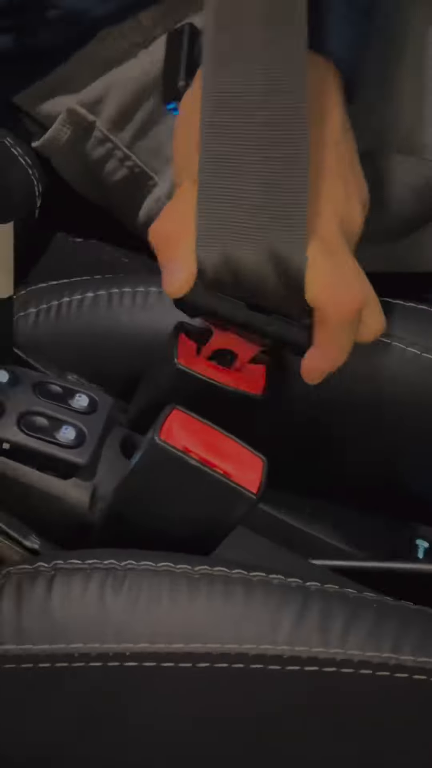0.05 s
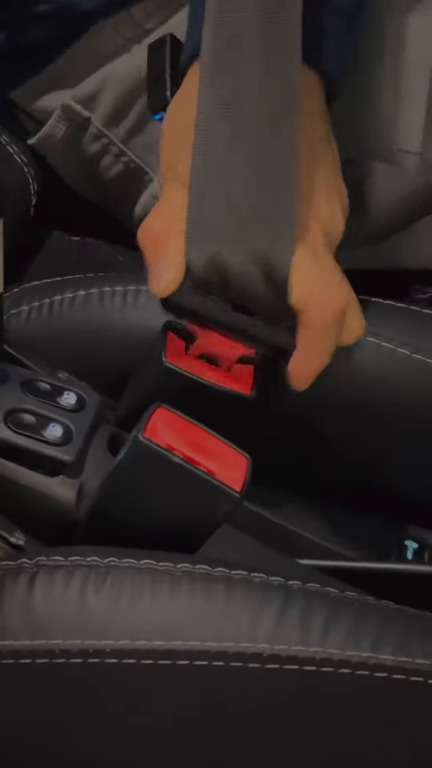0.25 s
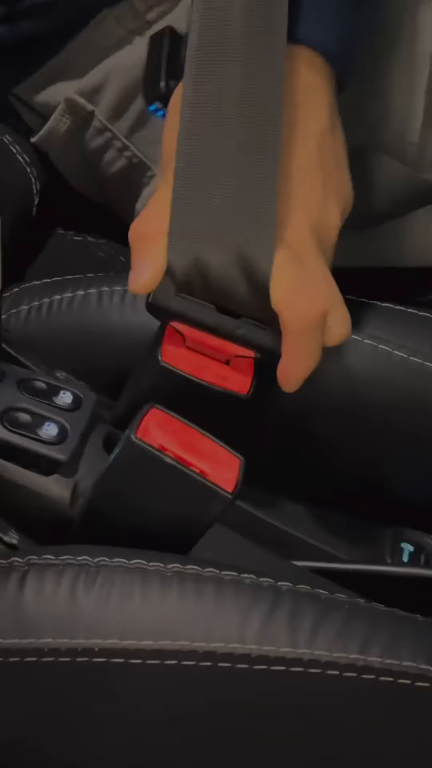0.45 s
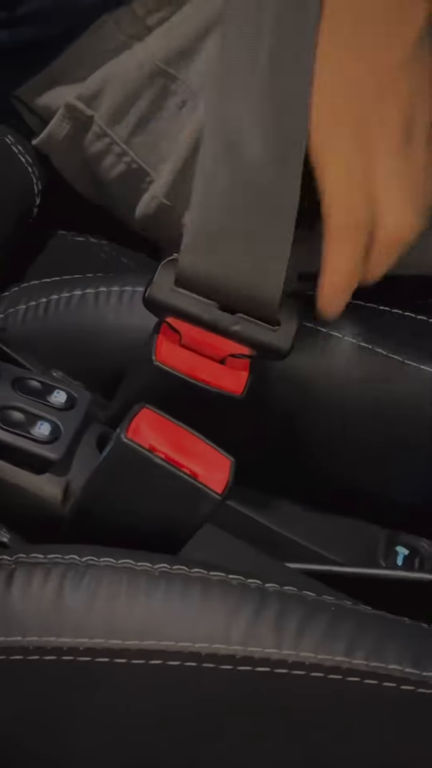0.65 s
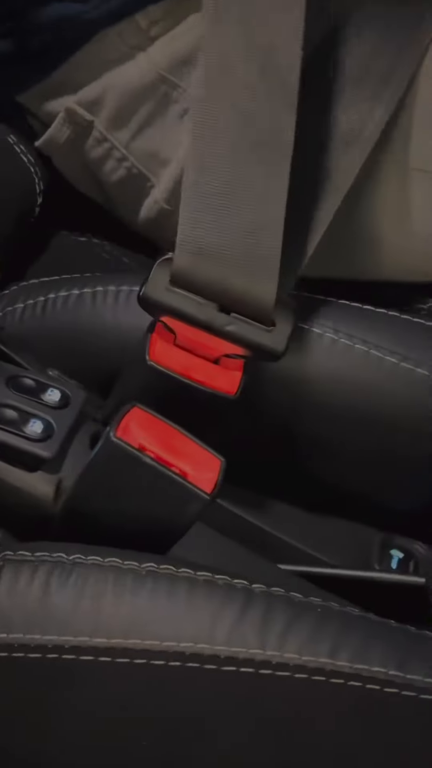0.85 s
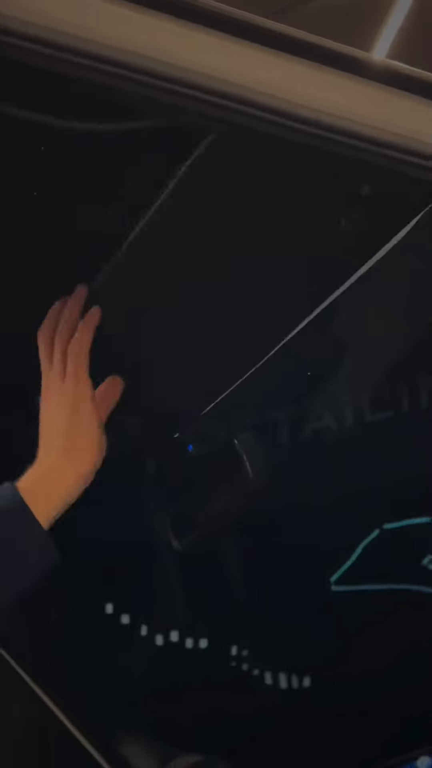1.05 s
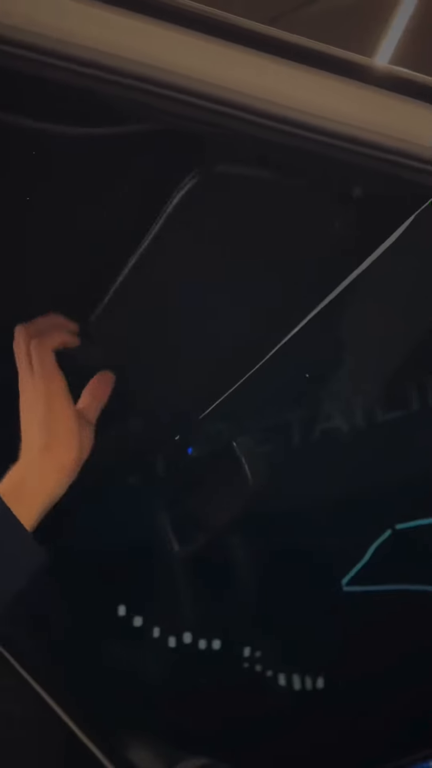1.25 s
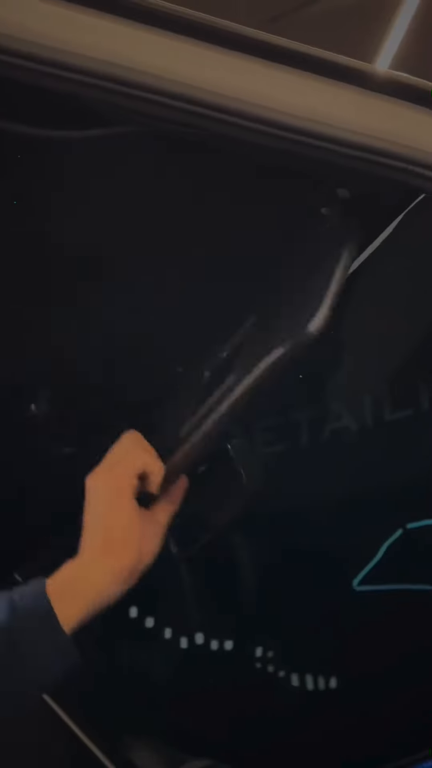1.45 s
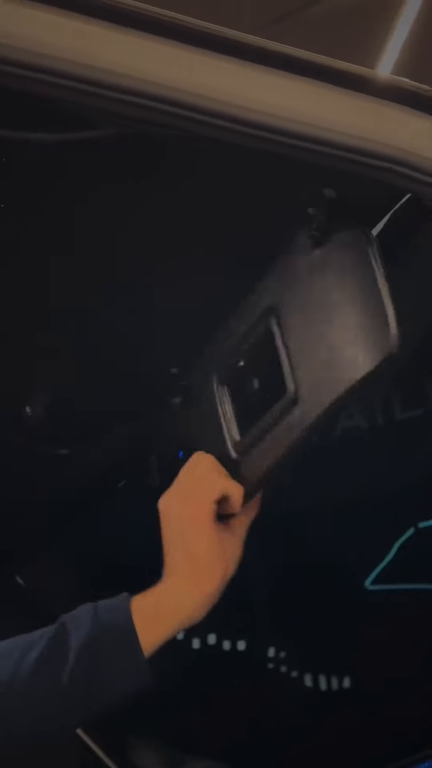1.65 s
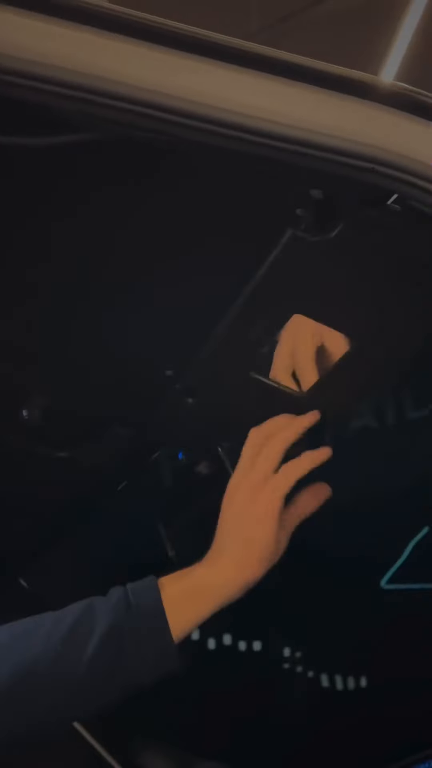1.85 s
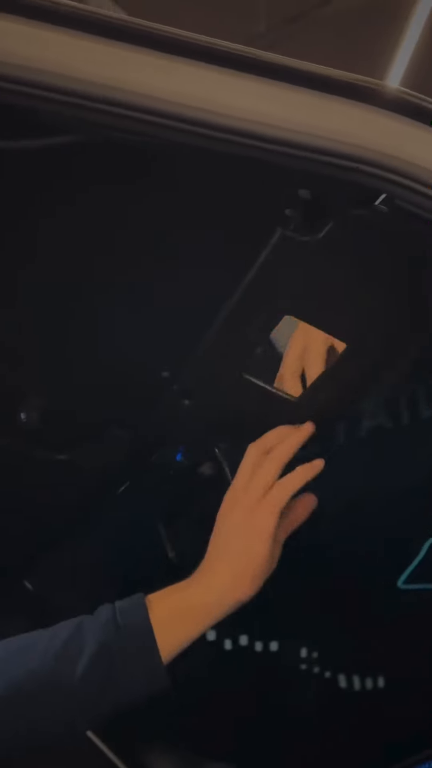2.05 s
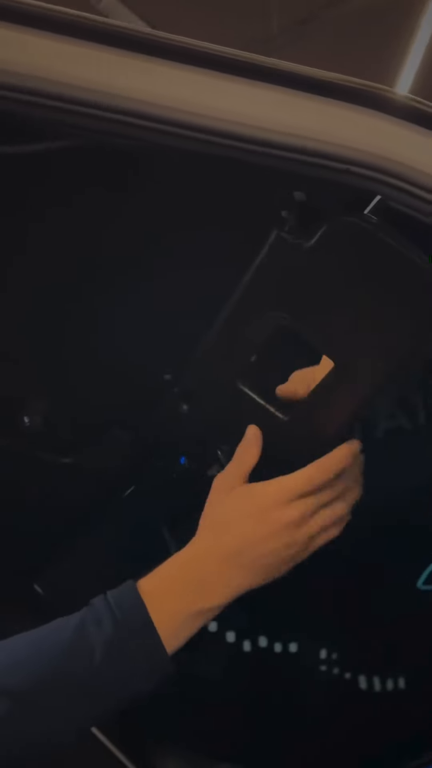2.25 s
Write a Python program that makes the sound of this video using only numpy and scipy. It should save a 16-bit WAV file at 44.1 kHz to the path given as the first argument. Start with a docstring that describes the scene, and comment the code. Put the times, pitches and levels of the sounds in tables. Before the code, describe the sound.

A seat belt clicks loudly into its buckle at about 0.2 seconds, close by inside a parked car. It rattles briefly at 0.4 seconds and the strap slides softly until 1 second, when the steady background hiss turns quieter and slightly hollow. From 1.1 to 1.8 seconds a sun visor folds down, its hinge creaking, then squeaking, ending in soft knocks. One last short creak comes near 2.1 seconds.

```python
"""Seat belt and sun visor in a parked car

Two shots inside the cabin, belt then visor. The belt's steel tongue snaps into its buckle, then
rattles as the hand lets go and the webbing slides. A sun visor is folded down: its hinge sticks and
slips, from a slow creak to a squeak, and the panel knocks softly. A last short creak follows.
A hiss lies under it all; at the cut it turns quieter and slightly hollow."""
import sys
import numpy as np
from scipy import signal
from scipy.fft import rfft, irfft, next_fast_len
from scipy.io import wavfile

SR = 44100
rng = np.random.default_rng(int(sys.argv[2]) if len(sys.argv) > 2 else 0)


def transcribe(u):
    """Save the signal u as a 16-bit wav file named by the first command-line argument.

    u: samples, shape (n,) or (channels, n), limited to [-1, 1]; the rate is SR.
    q: integer samples, one column per channel.
    """
    v = np.clip(np.atleast_2d(u).T, -1, 1)
    q = np.round(v * 32767).astype(np.int16)
    wavfile.write(sys.argv[1], SR, q)


N = 101429
T = np.arange(N) / SR
RING_T = np.arange(SR // 5) / SR  # time axis of one impact


# Modes of the housing and steel parts. Each row: pitch in Hz, level in dB, t60 in seconds.
STEEL_MODES = [(900, -10, .018), (1330, -8, .022), (1715, -4, .03), (2420, -7, .026), (3380, -5, .045),
               (3780, -2, .038), (5300, -5, .025), (5560, -6, .032), (6980, -3, .026), (7380, -6, .028),
               (7810, -2, .026), (8470, -3, .022), (8880, -3, .024), (9350, -1, .022)]
def strikes(contacts, colour, t60, ring_db, crack_db=-4):
    """Each contact of the tongue cracks in the plastic housing and rings the steel parts."""
    out = np.zeros(N)
    for start, db in contacts:
        ring = 0
        for hz, mode_db, mode_t60 in STEEL_MODES:
            envelope = amp(mode_db + rng.normal(0, 0.65)) * decay(mode_t60)
            ring += envelope * np.sin(2 * np.pi * (hz * RING_T + rng.random()))
        crack = noise(colour, len(RING_T)) * decay(t60)
        add(out, start, amp(db) * (amp(crack_db) * crack + amp(ring_db) * ring))
    return out


# The tongue's plastic cover on the buckle. Each row: start in seconds, level in dB, pitch in Hz.
COVER_TAPS = [(.3872, -28.5, 3800), (0.424, -37.5, 1370), (0.432, -34, 1280), (0.4381, -31, 1300),
              (0.449, -35, 1310)]
def cover_taps():
    """The cover touches the buckle: short hollow ticks."""
    out = np.zeros(N)
    for start, db, hz in COVER_TAPS:
        ring = shaped_noise(lambda f: resonances([(hz, 0.2 * hz, 0)], f), len(RING_T))
        add(out, start, amp(db) * ring * decay(0.022))
    return out


# The tongue's contacts, going in and once latched. Each row: start in seconds, level in dB.
LATCH_HITS = [(.2055, -14), (.2105, -4.5), (.2149, 0.5), (.2188, -4), (.2235, -22), (.228, -22)]
RATTLE_HITS = [(.4003, -18.5), (.4024, -14), (.406, -16), (.409, -19), (.4113, -34), (.416, -25.5),
               (.4372, -30)]
# Steel sliding in the slot. Each row: time in seconds, level in dB.
SCRAPE_LEVEL = [(.188, -93), (.192, -34), (.204, -41.5), (.212, -33), (.231, -27), (.235, -104)]
# Their spectra at the microphone. Each row: frequency in Hz, level in dB.
LATCH_COLOUR = [(100, -28), (300, -5.5), (550, -9), (900, 0), (1600, 3), (2300, -4.5), (3500, 2.5),
                (4700, -4), (6500, -2.5), (9000, 1.5), (10500, -9.5)]
RATTLE_COLOUR = [(100, -1), (750, -33), (1200, 4.5), (1700, -7), (2400, 1.5), (3000, -7.5), (3900, -2),
                 (5300, 0), (6400, -11), (7200, 13), (8300, -15), (10500, -14)]
SCRAPE_COLOUR = [(500, -24), (1500, -4), (6500, -15.5), (8600, 4.5), (9600, -18), (10500, -12.5)]
def buckle():
    """Down by the seat the tongue scrapes into the slot, latches, then shifts in the closed buckle."""
    latch = strikes(LATCH_HITS, LATCH_COLOUR, t60=0.024, ring_db=-10.5)
    scrape = rubbing(SCRAPE_LEVEL, SCRAPE_COLOUR)
    rattle = strikes(RATTLE_HITS, RATTLE_COLOUR, t60=0.023, ring_db=-18.5)
    return latch + scrape + rattle + cover_taps()


# Resonances of the visor panel. Each row: centre in Hz, width in Hz, level in dB.
PANEL_MODES = [(496, 97, -8), (1257, 20, 1), (1656, 17, 3.5), (2664, 55, 2.5), (3223, 26, 13)]
def panel(f, delay_s=0.0012, at_hz=1000):
    """The panel's response: it rings, and low bending waves cross later, so a slip becomes a chirp."""
    bending = np.exp(-4j * np.pi * delay_s * np.sqrt(at_hz * f))
    return bending * (1 + resonances(PANEL_MODES, f))


# The bright part of the hinge's rubbing. Each row: frequency in Hz, level in dB.
RASP_COLOUR = [(500, -11.5), (3000, -3.5), (7500, 1), (10000, -11.5)]
def stick_slip(stroke, colour, rub_swing=0.23, rasp_db=-1):
    """One pulse per slip of the hinge and some rubbing noise drive the visor panel."""
    rate, level_db, scatter, rub_db = curves(stroke)
    moving = (T >= stroke[0][0]) & (T <= stroke[-1][0])
    cycles = np.cumsum(rate * moving) / SR
    due = np.interp(np.arange(int(cycles[-1]) + 1), cycles[moving], np.flatnonzero(moving))
    i = due.astype(int)  # the sample at which each slip is due
    timing, strength = rng.standard_normal((len(due), 2)).T
    positions = due + timing * scatter[i] * SR / rate[i]
    slips = pulses(positions, np.sqrt(SR / rate[i]) * amp(1.86 * strength))
    swing = 1 + rub_swing * np.cos(2 * np.pi * cycles)
    rub = amp(rub_db) * moving * rng.standard_normal(N) * swing
    drive = (rub - slips) * amp(level_db)
    creak = filtered(drive, lambda f: minimum_phase(colour, f) * panel(f))
    rasp = filtered(rub * amp(level_db + rasp_db), lambda f: amp(along(RASP_COLOUR, f)))
    stroke_rms = np.sqrt(np.mean((moving * amp(level_db)) ** 2))
    return unit(creak) * stroke_rms + rasp


# Strokes of the hinge. Each row: time in seconds, slips per second, level in dB,
# timing scatter in periods, rubbing in dB relative to the slips.
CREAK = [(1.1135, 97.4, -38.5, 0.023, -20), (1.15, 142, -37, 0.049, -14), (1.178, 228, -41, 0.016, -18),
         (1.198, 212, -37, .015, -13), (1.217, 204, -34, 0.012, -13), (1.228, 245, -44.5, 0.028, -2),
         (1.25, 230, -34.5, 0.04, -10), (1.278, 267, -41, 0.039, -1.5), (1.3, 275, -36, 0.035, -8)]
SQUEAK = [(1.352, 1073, -38, .015, -15), (1.375, 784, -35, 0.02, -6), (1.393, 738.8, -42, 0.073, -3),
          (1.408, 566.7, -41, .14, 9), (1.425, 630, -45.5, 0.067, 6.5), (1.438, 673.4, -43, .02, -20),
          (1.447, 607.6, -44.5, 0.11, -9), (1.468, 316.8, -40, 0.13, 4), (1.49, 340.7, -37, 0.13, -4),
          (1.507, 655, -45, 0.11, 6.5), (1.524, 830.6, -38.5, 0.017, -20), (1.545, 877, -37.5, 0.014, -20),
          (1.567, 1046, -50.5, 0.022, -22), (1.587, 560.5, -37.5, 0.024, -18),
          (1.604, 493, -41, 0.044, -41), (1.628, 700, -41.5, 0.14, -12), (1.645, 900, -52.5, .06, -17),
          (1.675, 1072, -43.5, .03, -20)]
CHIRP = [(1.683, 330, -47, .08, -12), (1.697, 350, -37, .06, -14), (1.71, 300, -36, .04, -16),
         (1.719, 480, -27, .02, -18), (1.725, 720, -29, .03, -16), (1.731, 900, -34, .02, -16),
         (1.742, 985, -33, .02, -14), (1.749, 1100, -38, .05, -10)]
LAST_CREAK = [(2.047, 208.5, -43, 0.013, -8), (2.053, 271.4, -36, 0.022, -6),
              (2.062, 309.2, -34, 0.022, -30), (2.078, 321.6, -37, 0.013, -23),
              (2.087, 302.5, -38.5, 0.014, -10), (2.097, 308, -63, 0.054, -23)]
# The tone of each stroke going into the panel. Each row: frequency in Hz, level in dB.
CREAK_COLOUR = [(100, -18), (280, -4.5), (460, 5.5), (700, 0), (1100, -5), (1700, -5), (2500, -16.5),
                (3300, -18), (5500, -18.5), (8000, -45), (10000, -39)]
SQUEAK_COLOUR = [(100, -9), (300, -4.5), (550, 6.5), (1000, -0.5), (1600, -0.5), (2200, -9), (3200, -13.5),
                 (5000, -17), (7000, -15), (10000, -36)]
CHIRP_COLOUR = [(100, -14), (400, 5), (700, 3.5), (1100, -9), (1850, 1.5), (2500, -15), (4000, -18.5),
                (7000, -25), (10000, -32)]
LAST_COLOUR = [(100, -18.5), (310, 7), (650, 2.5), (1200, -5.5), (2000, -3.5), (2800, -6), (4000, -25),
               (7000, -14), (10000, -25.5)]
def hinge():
    """Up by the windscreen the visor turns: a creak, a squeak, a rising chirp and a last creak."""
    return (stick_slip(CREAK, CREAK_COLOUR) + stick_slip(SQUEAK, SQUEAK_COLOUR)
            + stick_slip(CHIRP, CHIRP_COLOUR) + stick_slip(LAST_CREAK, LAST_COLOUR))


# Sharp ticks of the hinge. Each row: start in seconds, level in dB.
TICKS = [(1.1135, -33.5), (1.469, -39), (1.487, -37), (1.491, -34), (1.631, -31.5), (1.7945, -26),
         (2.052, -32), (2.088, -32)]
# Their spectrum. Each row: frequency in Hz, level in dB.
TICK_COLOUR = [(200, -1), (700, 10.5), (1400, -2), (2700, 1), (3600, 3.5), (5300, -4), (6500, -24.5),
               (10000, -31)]
def hinge_ticks():
    """Single hard slips of the hinge."""
    out = np.zeros(N)
    for start, db in TICKS:
        add(out, start, amp(db) * noise(TICK_COLOUR, len(RING_T)) * decay(0.0065))
    return out


# Knocks of the buckle stalk and visor panel. Each row: start in seconds, level in dB, cutoff in Hz.
BUMPS = [(0.197, -26.5, 246), (0.218, -21.5, 345), (0.412, -41.5, 349), (1.302, -54, 402),
         (1.306, -28.5, 201), (1.331, -35.5, 248), (1.63, -34.5, 455), (1.745, -32.5, 350),
         (1.756, -35.5, 461), (1.773, -29, 180), (1.786, -32, 300), (1.795, -29.5, 860), (1.81, -33.5, 850)]
def bumps(low_hz=65):
    """Padded contacts: low thuds with a soft start."""
    out = np.zeros(N)
    envelope = decay(0.053) * (1 - decay(0.0045))
    for start, db, top_hz in BUMPS:
        band = lambda f: f ** 2 / (f ** 2 + low_hz ** 2) / np.sqrt(1 + (f / top_hz) ** 10)
        add(out, start, amp(db) * shaped_noise(band, len(RING_T)) * envelope)
    return out


# Sliding webbing, handling rumble and the belt's first rustle. Each row: time in seconds, level in dB.
WEBBING_LEVEL = [(.05, -66), (.066, -51), (.55, -47.5), (.68, -48), (.78, -43.5), (.98, -44.5), (.992, -86)]
RUMBLE_LEVEL = [(0, -46.5), (.09, -73), (1.0, -70.5), (1.13, -71), (1.16, -46), (1.22, -78), (1.4, -56.5),
                (1.5, -54), (1.6, -71), (1.82, -50), (1.9, -85)]
RUSTLE_LEVEL = [(0, -49), (.04, -45), (.052, -62.5), (.1, -95)]
# Their spectra at the microphone. Each row: frequency in Hz, level in dB.
WEBBING_COLOUR = [(200, -26.5), (1000, -8), (3000, -8), (6500, -1), (10000, -12.5)]
RUMBLE_COLOUR = [(25, -16.5), (65, -1), (150, -2.5), (300, -16), (900, -38.5), (4000, -77)]
RUSTLE_COLOUR = [(40, -12.5), (150, -13), (350, 14.5), (700, -9.5), (3000, -15.5), (8000, -30),
                 (10000, -42.5)]
def handling():
    """Close friction: the belt rustles dully, then slides with a hiss; handling adds a low rumble."""
    webbing = rubbing(WEBBING_LEVEL, WEBBING_COLOUR)
    rumble = rubbing(RUMBLE_LEVEL, RUMBLE_COLOUR)
    rustle = rubbing(RUSTLE_LEVEL, RUSTLE_COLOUR)
    return webbing + rumble + rustle


# Decay of the car's interior. Each row: frequency in Hz, t60 in seconds.
CABIN_T60 = [(100, 0.19), (500, .1), (3000, .08), (10000, 0.063)]
def cabin(x, wet_db):
    """The direct sound, with the padded cabin's short answer reaching the microphone just after it."""
    hz, t, spectrum = signal.stft(rng.standard_normal(SR // 4), SR, nperseg=256)
    fade = np.exp(-np.log(1000) * t / along(CABIN_T60, hz)[:, None])
    tail = signal.istft(spectrum * fade, SR, nperseg=256)[1]
    tail = np.pad(tail, (SR // 400, 0))  # 2.5 ms late
    return x + amp(wet_db) * signal.fftconvolve(x, tail / np.linalg.norm(tail))[:N]


# The hiss behind the belt. Each row: time in seconds, level in dB.
BELT_HISS_LEVEL = [(.06, -47), (.28, -44.5), (.5, -45.5), (.98, -44.5), (.995, -62)]
# Spectra of the hiss behind the belt and the visor. Each row: frequency in Hz, level in dB.
BELT_HISS_COLOUR = [(15, -48), (25, -25.5), (59, -1.5), (164, -10.5), (264, 0), (322, -6.5), (458, -3),
                    (506, -8.5), (560, -7.5), (1640, -16.5), (2220, -13), (3400, -16), (3860, -13.5),
                    (6870, -26.5), (10000, -38), (13000, -60), (22000, -120)]
VISOR_HISS_COLOUR = [(25, -28), (60, -8), (110, 5), (190, -12.5), (270, 2), (400, -11.5), (750, -3),
                     (1100, -5.5), (1320, -4), (1460, -8.5), (2400, -8), (4500, -7.5), (5100, -12),
                     (6600, -12), (8100, -19.5), (10000, -26.5)]
# Hollow peaks in the later hiss. Each row: centre in Hz, width in Hz, level in dB.
HISS_PEAKS = [(1661, 44, 1), (3060, 22, 3.5), (3240, 78, -2.5), (4200, 100, -17)]
CUT_S = 0.99
def hiss():
    """Each shot has its own steady hiss; at the cut it turns quieter and slightly hollow."""
    early = amp(curves(BELT_HISS_LEVEL)[0]) * noise(BELT_HISS_COLOUR)
    hollow = shaped_noise(lambda f: resonances(HISS_PEAKS, f))
    late = amp(-52.5) * noise(VISOR_HISS_COLOUR) + amp(-57) * hollow
    return early * fade_in(0.052, 0.012) + late * fade_in(CUT_S, 0.0042)


# Faint tones in the hiss. Each row: pitch in Hz, level in dB.
WHINE_TONES = [(1674, -69.5), (1916, -64), (2697, -67), (3176, -64.5), (3381, -63), (4312, -66),
               (4600, -72.5)]
def whine(width_hz=9.7):
    """Narrow bands of noise, heard as thin unsteady tones after the cut."""
    out = np.zeros(N)
    for hz, db in WHINE_TONES:
        out += amp(db) * shaped_noise(lambda f: resonances([(hz, width_hz, 0)], f) ** 2)
    return out * (T > CUT_S)


# A thin tone. One row: start in seconds, pitch in Hz, level in dB, t60 in seconds.
OPENING_TONE = (0, 4212, -58, 1.7)
def opening_tone():
    """A faint, brief 4.2 kHz tone at the very start."""
    out = np.zeros(N)
    start, hz, db, t60 = OPENING_TONE
    add(out, start, amp(db) * decay(t60) * np.sin(2 * np.pi * hz * RING_T))
    return out


def rubbing(level, colour):
    """Smooth friction noise that follows a movement."""
    return amp(curves(level)[0]) * noise(colour)


def amp(db):
    """Decibels to gain."""
    return 10 ** (np.asarray(db) / 20)


def unit(x):
    """Scaled to rms 1."""
    return x / np.sqrt(np.mean(x ** 2) + 1e-20)


def along(points, hz):
    """(Hz, value) points interpolated on a log axis."""
    f, values = np.transpose(points)
    return np.interp(np.log(hz + 1), np.log(f + 1), values)


def curves(rows):
    """One value per sample for each column after the time."""
    times, *columns = np.transpose(rows)
    return [np.interp(T, times, column) for column in columns]


def filtered(x, response):
    """x through a complex frequency response."""
    size = 2 * next_fast_len(len(x) // 2 + SR // 10)
    return irfft(rfft(x, size) * response(np.fft.rfftfreq(size, 1 / SR)), size)[:len(x)]


def minimum_phase(colour, hz):
    """Causal response with the given colour."""
    cepstrum = irfft(np.log(amp(along(colour, hz))))
    half = len(cepstrum) // 2
    cepstrum[1:half] *= 2
    cepstrum[half + 1:] = 0
    return np.exp(rfft(cepstrum))


def resonances(rows, f):
    """Response of a set of damped resonances."""
    return sum(amp(db) * 1j * f * width / (hz * hz - f * f + 1j * f * width) for hz, width, db in rows)


def shaped_noise(response, size=N):
    """Noise through a frequency response, at rms 1."""
    return unit(filtered(rng.standard_normal(size), response))


def noise(colour, size=N):
    """Coloured noise of rms 1."""
    return shaped_noise(lambda hz: amp(along(colour, hz)), size)


def pulses(positions, heights):
    """Impulses placed between samples as windowed sincs."""
    samples = positions.astype(int)[:, None] + np.arange(-7, 9)
    offset = samples - positions[:, None]
    shape = np.sinc(offset) * np.cos(np.pi * offset / 16) ** 2
    return np.bincount(samples.ravel(), (shape * heights[:, None]).ravel(), N)


def decay(t60):
    """An exponential fall of 60 dB in t60 seconds."""
    return np.exp(-np.log(1000) * RING_T / t60)


def fade_in(start_s, length_s):
    """A straight rise from 0 to 1."""
    return np.clip((T - start_s) / length_s, 0, 1)


def add(track, start_s, sound):
    """Mix a sound into the track."""
    part = track[round(start_s * SR):][:len(sound)]
    part += sound[:len(part)]


def scene():
    """Two shots in mono: the buckle nearly dry, then the visor with more of the cabin."""
    belt = buckle()
    visor = hinge() + hinge_ticks()
    close = bumps() + handling()
    mono = cabin(belt, wet_db=-21) + cabin(visor + opening_tone(), wet_db=-6) + close + hiss() + whine()
    return np.array([mono, mono])


def record(dry, ceiling=0.8, top_hz=9900):
    """The recorder clips the loudest peaks and cuts the top treble steeply."""
    lowpass = lambda hz: 1 / np.sqrt(1 + (hz / top_hz) ** 120)
    return np.array([filtered(channel, lowpass) for channel in np.clip(dry, -ceiling, ceiling)])


dry = scene()
out = record(dry)
transcribe(out)
```